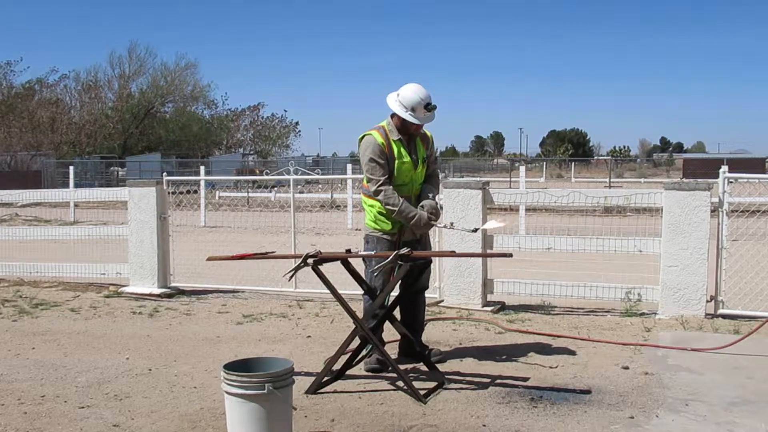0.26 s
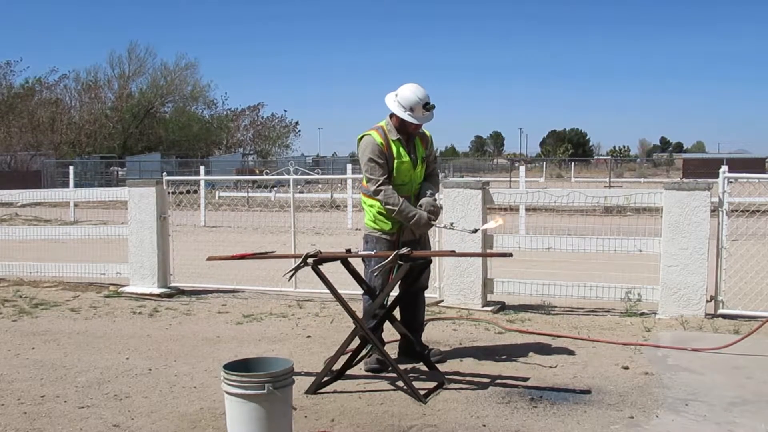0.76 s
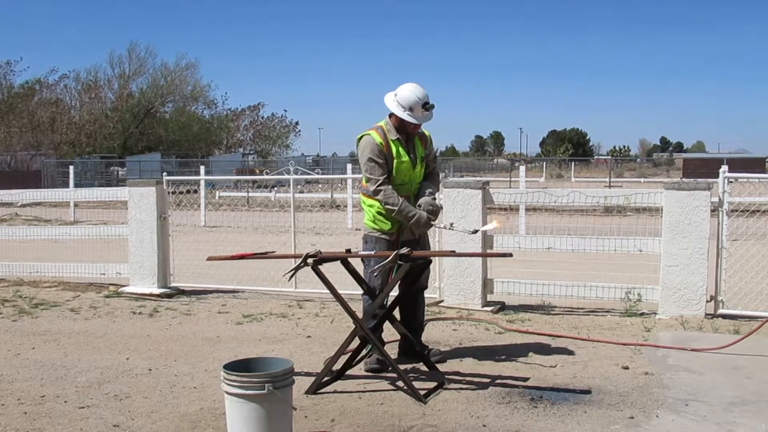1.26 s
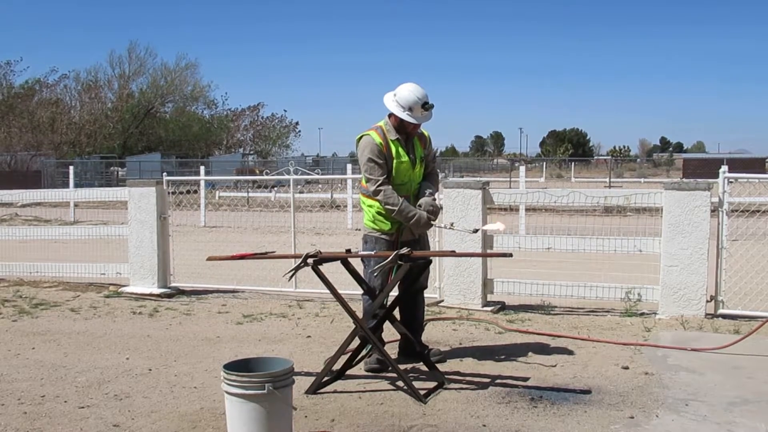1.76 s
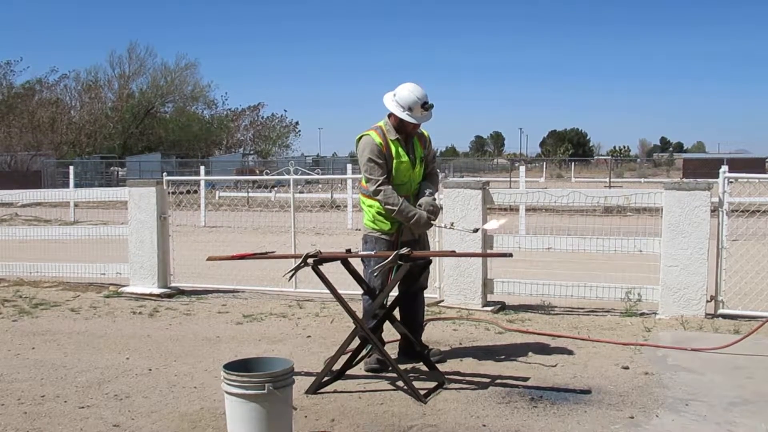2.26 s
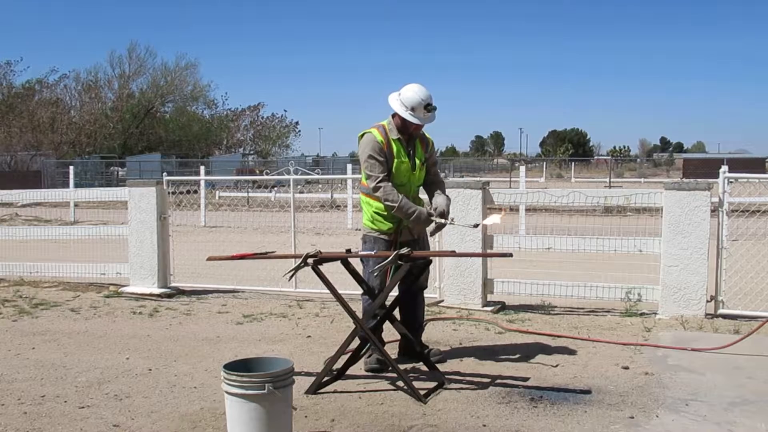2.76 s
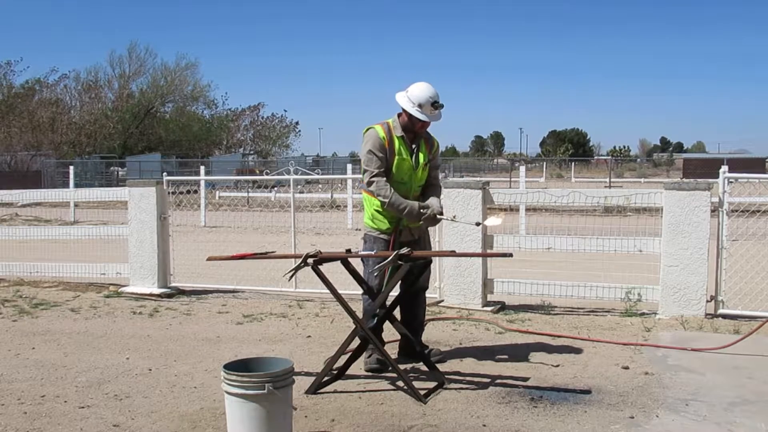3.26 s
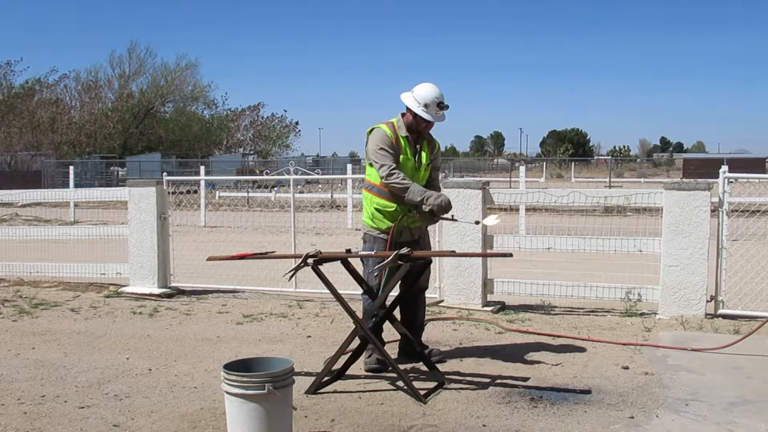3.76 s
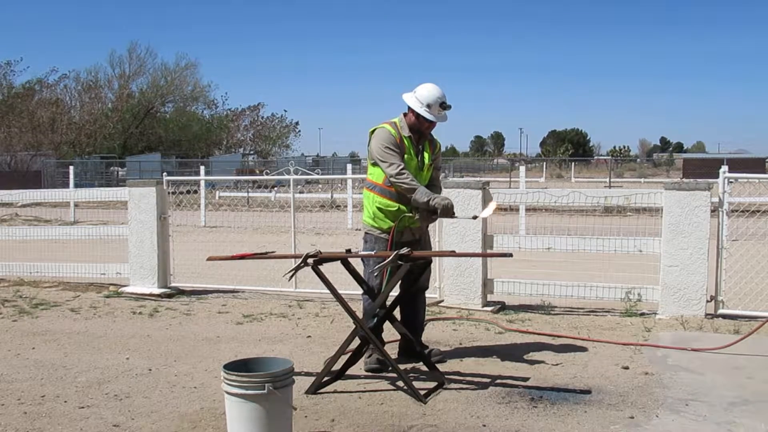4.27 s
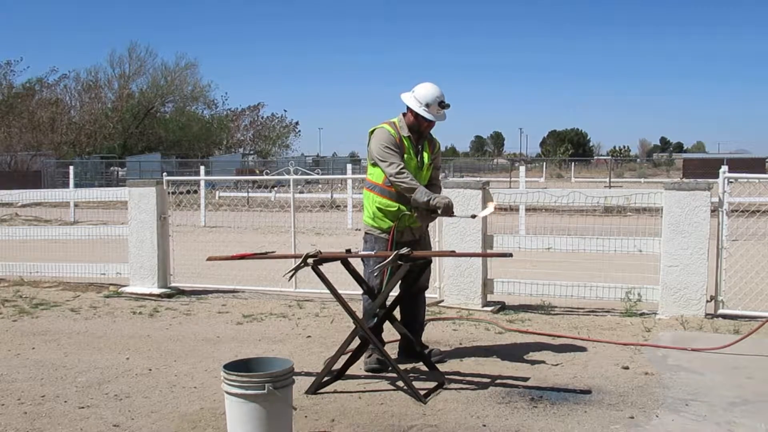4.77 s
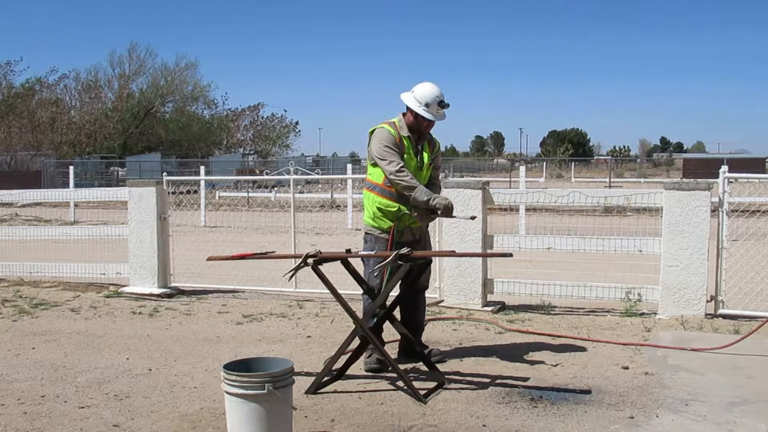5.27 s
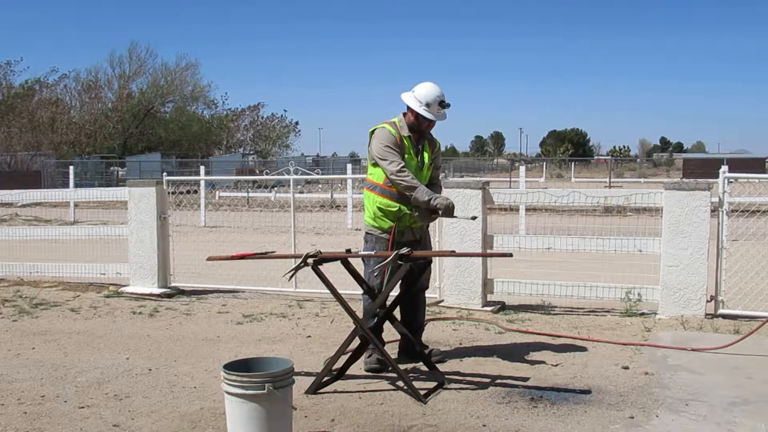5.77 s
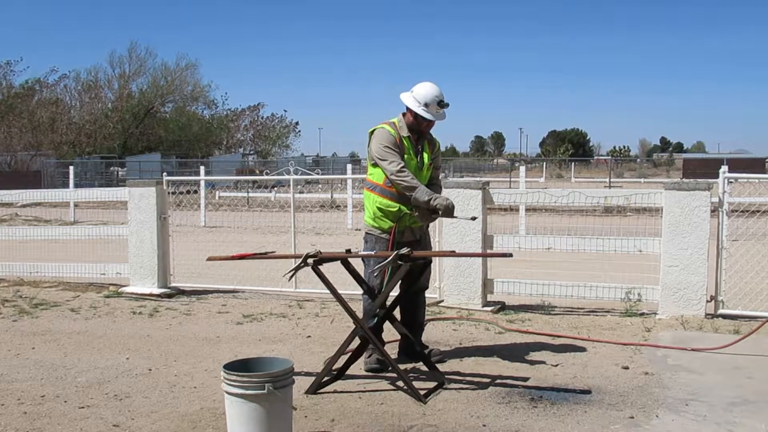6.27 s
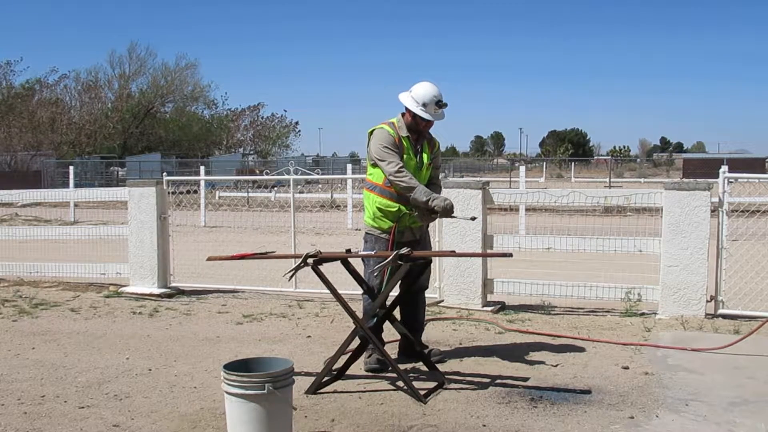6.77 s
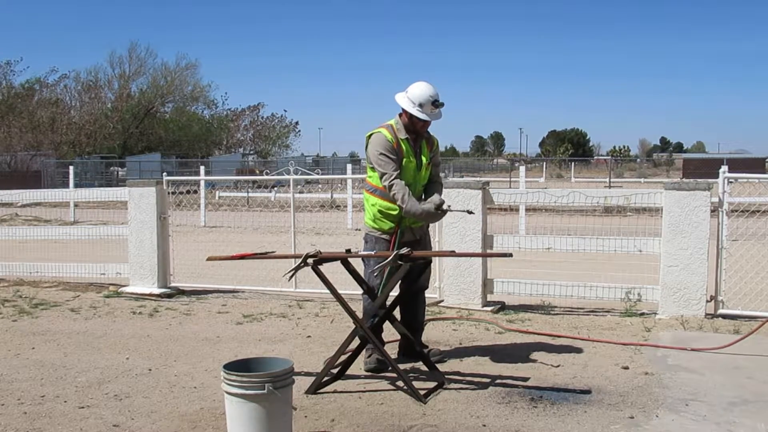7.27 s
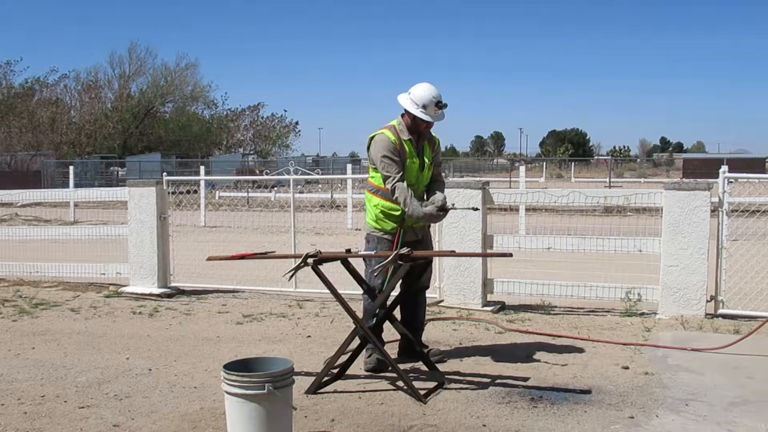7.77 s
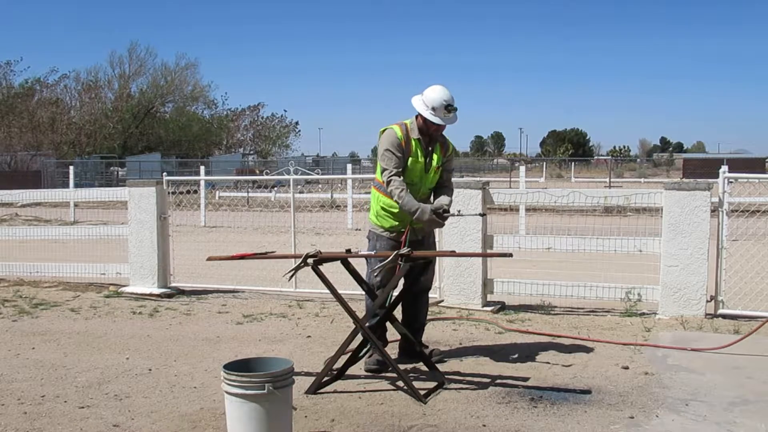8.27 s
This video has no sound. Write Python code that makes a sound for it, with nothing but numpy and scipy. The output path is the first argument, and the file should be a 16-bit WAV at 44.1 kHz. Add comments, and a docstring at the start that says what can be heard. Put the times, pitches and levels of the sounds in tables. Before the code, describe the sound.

A gas torch flame roars and flutters outdoors, snaps tight with a bright crack, then hisses steadily while wind thumps the microphone.

```python
"""Cutting torch in a windy yard

A gas flame roars, fizzes and flutters, heard straight and off the hard ground: coloured noise with drawn levels.
It spits decaying bursts of noise, snaps tight with one bright ringing crack, and later the oxygen jet hisses briefly.
Gusts and single eddies thump on the microphone port: lumpy low noise and short sliding pulses.
The flame level is drawn to sink around the gusts. Faint wavering tones and hiss from the electronics lie beneath.
"""
import sys
import numpy as np
from scipy import signal
from scipy.fft import rfft, irfft, next_fast_len
from scipy.io import wavfile
from scipy.ndimage import uniform_filter1d, minimum_filter1d, map_coordinates

SR = 44100
rng = np.random.default_rng(int(sys.argv[2]) if len(sys.argv) > 2 else 0)


def wav_record(signal):
    """Record a signal, one row per channel, as 16-bit PCM in the file named by sys.argv[1]."""
    frames = np.transpose(np.atleast_2d(signal))
    bounded = np.clip(frames, -1, 1)
    # unit amplitude maps onto the largest positive 16-bit level
    quanta = np.round(bounded * 32767).astype(np.int16)
    wavfile.write(sys.argv[1], SR, quanta)


N = 375732

# Every spectrum gives a relative shape (density per Hz); rush() scales the noise to rms 1.
# Flame level before flicker: start_s, base_db, fizz_db (over the base), body_db (gain on the low body)
FLAME_LEVELS = [(0, -31, -6, 0), (.5, -33.5, -6.5, 2), (.58, -37, -9.5, 2), (1.06, -38.5, -6, -1),
                (1.1, -45, -7, -2), (1.15, -51, -8, 4), (1.17, -54.5, -9, 0), (1.25, -60, -11, 2),
                (1.27, -50, -2, -3), (1.29, -51, -4, -3), (1.305, -55, -11, 2), (1.375, -61, -10, 0),
                (1.39, -53, -4, -6), (1.42, -58, -7, -4), (1.5, -53, -2, -4), (1.54, -45.5, -4, -6),
                (1.62, -46, -7.5, -6), (1.87, -45, -0.5, 3), (1.9, -51, -6, -5), (2.32, -47, -4, -3),
                (2.41, -41, -7, -4), (2.58, -41, -6, -2), (2.78, -44, -4.5, -7), (2.85, -42.5, -3.5, 1),
                (2.935, -42.5, -6, 0), (2.95, -47.5, -3, 0), (3.01, -48.5, -6, 5), (3.05, -46, -5, 0),
                (3.066, -37, -7, -3.5), (3.3, -39.5, -5, 0), (3.84, -40.5, -5.5, 0.5), (4.1, -39, -6, -1.5),
                (4.34, -40.5, -8, 6), (5.0, -38, -6.5, 2.5), (5.2, -40, -9, 8), (5.315, -36, -9, 5),
                (5.33, -46, -20, 20), (5.4, -46, -30, 9), (5.6, -50, -32, 2), (5.89, -45, -13.5, 1.2),
                (6.22, -39, -14, 1.5), (7.5, -34, -12, 1), (7.86, -28.5, -8, -5.5), (8.16, -31, -11.5, 4),
                (8.52, -28.5, -12, -0.5)]
# Spectrum of the burning roar: pitch_hz, density_db
ROAR_SPECTRUM = [(330, -32), (460, -3.5), (800, -3.5), (960, -2.5), (1060, -7), (1600, -5.5), (3000, -10),
                 (4500, -18), (7000, -26.5), (12000, -58)]
# Spectrum of the fine eddies at the tip: pitch_hz, density_db
FIZZ_SPECTRUM = [(1500, 2.5), (3500, 0), (5000, -1), (7000, -4), (10000, -7), (11300, -9), (12000, -17),
                 (15000, -63)]
# Narrow resonances of the tip that colour the roar: pitch_hz, width_hz, boost_db (of the added band)
TIP_RESONANCES = [(462, 28, -2), (867, 57, -10), (1158, 27, 4.5), (1483, 20, 2.5), (1626, 8.3, -10),
                  (2245, 24, -8), (2383, 23, -3), (3390, 21, -4.5), (4840, 23, -15)]
# The flame flares up or falters: centre_s, change_db, half_length_s (to 1/e of the change)
FLARES = [(0.187, 4.5, 0.053), (0.953, 1, 0.025), (1.651, 3, 0.015), (1.736, 5.5, .025),
          (3.13, -3.5, 0.018), (3.185, 4.5, .02), (3.24, 3.5, .012), (3.29, 3.5, 0.014), (3.637, 4.5, .03),
          (3.874, 3, 0.025), (3.931, 9, 0.032), (4.005, 2, .03), (4.1, 4, 0.026), (4.172, -5.5, 0.015),
          (4.268, 7.5, 0.038), (4.313, 4, 0.0098), (4.527, 2.5, .025), (4.597, 3.5, .009),
          (4.654, 3, 0.018), (4.704, 4.5, 0.011), (4.84, -4, 0.036), (4.96, 2, 0.026), (5.07, 7.5, 0.033),
          (5.118, 6, .012), (6.1, 4.5, 0.015), (6.152, 3.5, 0.025), (7.04, 2.5, 0.017)]
# Spectrum of the oxygen jet: pitch_hz, density_db
JET_SPECTRUM = [(1060, -36), (1800, -5), (2360, -2), (2600, -3), (3030, -3.5), (10900, -8.5), (15400, -24)]
# The flame spits and snaps: start_s, level_db (where the decay starts)
SNAP_TIMES = [(3.0614, -43), (3.1562, -31), (3.909, -38), (4.3734, -43), (5.022, -27.5), (5.062, -26.5),
              (5.0765, -29), (5.1078, -41), (5.237, -29), (5.2894, -35)]
# Spectrum of a snap: pitch_hz, density_db
SNAP_SPECTRUM = [(590, -34), (1000, 3), (2900, 3.5), (3360, -3), (6100, -10.5), (13100, -23), (15400, -32)]
# Spectrum of the bright crack: pitch_hz, density_db
POP_SPECTRUM = [(700, -30), (1500, -3), (2900, -11), (4200, -14), (5400, -9), (6800, -17), (9000, -21),
                (13900, -18), (15400, -26)]
# Ringing tones of the metal tip at the crack: pitch_hz, level_db (where the decay starts), t60_s
NOZZLE_RING = [(1515, -27, 0.085), (5250, -33, 0.066), (5870, -30, 0.091)]
# Delay of the path off the ground behind the straight one: start_s, lag_ms
GROUND_LAG = [(0, 1.22), (1.3, 1.22), (1.95, 1.18), (2.3, 1.25), (2.65, 1.272), (3.8, 1.267), (4.4, 1.335),
              (4.8, 1.345), (5.45, 1.33), (5.8, 1.29), (7.2, 1.25), (7.6, 1.305), (8.52, 1.315)]
# Gusts at the port: start_s, length_s, buffeting_db, rasp_db (gain on the part above the rumble)
GUSTS = [(0, 0.065, -33, -11), (0.342, .02, -34, -7), (0.51, .03, -26, -6), (0.542, 0.052, -27, -14),
         (.79, .1, -38, -18), (1.17, 0.1, -23.5, -8), (1.3, .05, -36, -16), (1.35, 0.13, -28, -12),
         (1.482, .055, -23, -1.5), (1.532, .13, -24.5, -10), (1.69, 0.055, -22, -2),
         (1.765, 0.113, -26, -7), (1.996, 0.04, -29.5, -4), (2.043, 0.079, -18.5, -7),
         (2.165, .018, -26, -6), (2.2, .033, -24, 0), (2.242, 0.17, -27.5, -7.5), (2.45, .02, -37, -13),
         (2.7, .04, -24, -18), (2.8, 0.071, -24, -8), (2.864, 0.062, -20, 0), (2.94, .04, -28.5, -10),
         (4.045, 0.068, -38, -12), (5.067, 0.072, -28.5, -22), (5.19, 0.028, -29, -9),
         (5.278, .025, -24, -12), (5.308, 0.06, -20, 2), (5.375, 0.073, -29, 3), (5.468, .058, -22, 6),
         (5.542, .014, -26, -1), (5.575, .01, -26, -1), (5.597, .025, -22, 3), (5.632, .012, -28, 0),
         (5.655, .06, -31, -12), (5.975, .045, -34, -11), (7.307, 0.054, -30, -6), (7.372, 0.12, -25, -7)]
# Spectrum of gusts and of the flurry behind an eddy: pitch_hz, density_db
BUFFET_SPECTRUM = [(15, -38), (28, -5), (60, 6.5), (195, 4), (391, -2.5), (465, -3.5), (744, -14.5),
                   (1600, -46), (2080, -54), (3520, -120)]
# Calm air at the port, before its slow wobble: start_s, level_db
CALM_LEVELS = [(0, -40), (.31, -42.5), (.7, -44), (.88, -41), (1.1, -46), (2.6, -46.5), (3.28, -46),
               (3.8, -42.5), (4.0, -43.5), (4.1, -41), (5.0, -36.5), (5.7, -44), (6.1, -49.5), (6.79, -48),
               (7.26, -44), (7.95, -41), (8.52, -41)]
# Spectrum of calm air: pitch_hz, density_db
BREEZE_SPECTRUM = [(15, -50), (30, -15.5), (85, -5), (145, -1.5), (275, -9.5), (305, -9.5), (420, -6),
                   (550, -45), (920, -120)]
# Single eddies that thump on the port, from faint to hard:
# blow_s, strength_db, pitch_hz (at the blow), edge_db (over the strength)
EDDIES = [(.015, -19.5, 132, -40), (0.056, -18.5, 129, -40), (.504, 2, 260, -28), (.511, -4, 600, -12),
          (.516, 7, 405, -20), (.519, -2, 252, -25), (.526, -6, 130, -30), (0.543, -17, 140, -31),
          (.573, -7, 218, -30), (1.161, 0, 203, -21), (1.188, -12, 150, -34), (1.212, -13.5, 220, -30),
          (1.247, -12, 120, -30), (1.253, -17, 420, -20), (1.26, -8.5, 170, -23), (1.282, 2.5, 139, -35),
          (1.286, 0, 382, -19), (1.296, -13, 400, -26), (1.357, -11, 150, -38), (1.393, -12.5, 190, -35),
          (1.401, -6.5, 250, -40), (1.421, -16, 452, -24), (1.433, -10, 262, -29), (1.48, -17, 300, -19),
          (1.487, -13, 420, -17), (1.495, -11, 400, -20), (1.503, -1, 300, -25), (1.508, -6, 450, -20),
          (1.524, -14, 350, -22), (1.549, -14, 150, -30), (1.515, -3.5, 308, -30), (1.587, -8.5, 180, -33),
          (1.611, -7, 159, -34), (1.62, -9, 179, -30), (1.64, -10, 330, -28), (1.665, -5.5, 213, -38),
          (1.69, -3.5, 340, -38), (1.714, -11, 230, -12), (1.742, -17, 149, -22), (1.762, -16, 120, -30),
          (1.77, -1.5, 300, -20), (1.774, -9, 280, -27), (1.787, -2, 330, -26), (1.792, -4, 280, -27),
          (1.797, 1, 445, -12), (1.804, -10, 330, -25), (1.819, -6, 330, -22), (1.831, -6, 380, -15),
          (1.84, 0, 380, -21), (1.85, 2.5, 514, -16), (1.859, -11, 380, -20), (1.864, -7, 450, -18),
          (1.87, -4, 600, -19), (1.874, 4, 408, -13.5), (1.901, -15, 240, -29), (1.911, -19, 260, -29),
          (1.937, -27, 150, -35), (1.988, -3, 269, -35), (2.004, -22, 350, -25), (2.04, -18, 200, -28),
          (2.067, -11.5, 160, -27), (2.085, -14, 170, -30), (2.095, -8.5, 260, -21), (2.111, -5, 270, -32),
          (2.12, -7.5, 238, -38), (2.166, -10, 260, -34), (2.176, -10, 222, -33), (2.126, -18, 200, -30),
          (2.211, -13, 380, -21), (2.226, -14, 380, -18), (2.27, -20, 220, -28), (2.317, -21, 150, -30),
          (2.393, -15, 200, -28), (2.458, -23, 170, -30), (2.305, -13, 160, -29), (2.381, -12, 230, -26),
          (2.698, -4.5, 201, -41), (2.708, -3.5, 180, -43), (2.716, -15, 200, -35), (2.725, -12, 120, -35),
          (2.769, -23, 300, -25), (2.804, -9.5, 120, -38), (2.813, -10, 280, -30), (2.831, -18, 250, -28),
          (2.841, -9, 230, -23), (2.878, -3.5, 200, -30), (2.886, -15, 230, -30), (2.896, -17, 350, -22),
          (2.901, -8, 480, -15), (2.907, -5, 382, -16), (2.927, -10, 315, -19), (2.954, -8.5, 188, -31),
          (2.963, -15.5, 220, -30), (4.058, -25, 110, -40), (4.092, -22, 120, -35), (5.083, -19, 200, -13),
          (5.188, -12, 150, -28), (5.195, -10, 149, -28), (5.214, -8, 160, -30), (5.22, -3, 314, -31),
          (5.275, -4.5, 160, -26), (5.286, -4, 107, -24), (5.308, 6, 292, -15), (5.322, 3, 367, -13),
          (5.337, 3.5, 315, -13), (5.352, -4, 260, -28), (5.363, 1.5, 720, -7.5), (5.38, -10, 360, -8),
          (5.394, -4.5, 505, -10), (5.372, -6, 400, -10), (5.421, -11, 350, -7.5), (5.427, -14.5, 500, -11),
          (5.475, -7, 270, -13), (5.484, -4.5, 490, -7.5), (5.49, -5, 500, -13), (5.499, -2, 342, -18),
          (5.505, -3, 300, -13), (5.512, -4, 330, -18), (5.52, -2.2, 330, -11), (5.546, -6.5, 302, -18),
          (5.577, 6, 500, -16), (5.584, -10, 450, -10), (5.552, -13, 450, -12), (5.598, -12, 450, -9),
          (5.606, -9, 500, -4), (5.612, 0.5, 320, -10.5), (5.619, -7.5, 420, -5.5), (5.641, -5.5, 383, -14),
          (5.704, -23.5, 170, -30), (5.859, -32, 170, -30), (5.802, -28.5, 190, -30),
          (5.875, -29, 150, -30), (5.95, -23, 180, -30), (5.975, -27, 200, -27), (5.99, -21, 200, -22),
          (6.0, -13.5, 170, -25), (6.006, -17, 280, -22), (7.306, -8.5, 191, -25), (7.322, -13, 140, -22),
          (7.335, -7.5, 198, -31), (7.356, -16, 250, -16), (7.394, -14, 190, -23), (7.408, -6.5, 308, -24),
          (7.422, -9, 161, -25), (7.47, -13.5, 191, -21)]
# Spectrum of the sharp edge of a blow: pitch_hz, density_db
EDGE_SPECTRUM = [(350, -24), (650, 8.5), (1100, -5), (1800, -21), (2700, -28), (4000, -56), (7000, -90)]
# Level of the electronic noise, drawn to sink after the hardest gusts: start_s, change_db
ELECTRONICS_LEVELS = [(0, 0), (1.1, 8), (1.9, 1.5), (2, -1.5), (3, 1.5), (5.2, 11.5), (5.34, -5),
                      (5.65, -11), (5.9, -6), (6.5, 0.5), (8.52, 3)]
# Electronic tones before their waver and level change: pitch_hz, peak_db
WHINE_TONES = [(7337, -75), (7503, -69), (8354, -77), (10718, -70), (10896, -76)]
# Spectrum of the electronic hiss: pitch_hz, density_db
HISS_SPECTRUM = [(1500, -27), (3000, -32), (5500, -28), (7150, -10), (7450, -3), (7800, -8), (9500, -12),
                 (10800, 4.5), (11400, -6), (13000, -9), (15000, -22)]

FLUTTER_DB, FLARE_FLUTTER = 0.91, 0.2  # depth scale of the flicker; extra depth per dB of flare or falter
TIGHT_FLUTTER = 0.58  # share of the slow flicker that the tight flame keeps
JET_OPEN_S, JET_SHUT_S, JET_DB = 7.615, 7.895, -30
JET_RISE_DB_PER_S, JET_FALL_DB_PER_S = 700, 300
JET_SWELL_S, JET_SWELL_DB, JET_SWELL_HALF_S = 7.79, 4.5, 0.13  # the jet swells over its base level
SNAP_T60_S = 0.091
POP_S, POP_DB, POP_T60_S = 5.2475, -20.5, 0.059
GUST_RISE_DB_PER_S, GUST_FALL_DB_PER_S = 1200, 700
# the lowest sound is cut sharply for a moment and comes back
BASS_OUT_S, BASS_BACK_S, BASS_DROP_DB, BASS_FADE_DB_PER_S = 7.63, 7.925, 47, 2500
EDDY_CYCLES = 0.3  # time scale in the eddy's own cycles: it builds in 2/3 of this and lets go in twice this
# tick in a blow: pitch over the eddy's, half length in the eddy's cycles, dB over the edge
TICK_PITCH, TICK_CYCLES, TICK_DB = 2.33, 0.23, -3.5
LIMIT_S, TOP_HZ = 0.0015, 15500  # limiter reach; band limit


def flame():
    """Turbulent burning roars and finer eddies at the tip fizz; both flutter together, more so in a flare."""
    base_db, fizz_db, body_db = curves(FLAME_LEVELS)
    t = np.arange(N) / SR
    coarse_t = t[::32]
    flares = sum(db * np.exp(-((coarse_t - s) / half) ** 2) for s, db, half in FLARES)
    flare_db = np.interp(t, coarse_t, flares)

    slow_share = np.where(t < POP_S, 1, TIGHT_FLUTTER)
    flicker = 0.85 * slow_share * wobble(16) + 0.5 * wobble(45) + wobble(140)
    flutter_db = (FLUTTER_DB + FLARE_FLUTTER * np.abs(flare_db)) * flicker

    roar = amp(2.0) * resonant(rush(ROAR_SPECTRUM, patchy_db=1.23))
    # the drawn body gain raises or lowers the flame's low part
    body = filtered(roar, lambda hz: 1 / (1 + (hz / 1000) ** 6))
    fizz = amp(fizz_db) * rush(FIZZ_SPECTRUM, patchy_db=2.0)
    return amp(base_db + flare_db + flutter_db) * (roar + (amp(body_db) - 1) * body + fizz)


def resonant(x):
    """The torch tip adds a few narrow resonant bands to the sound."""
    def response(f):
        return 1 + sum(amp(db) * 1j * f * w / (c * c - f * f + 1j * f * w) for c, w, db in TIP_RESONANCES)
    return filtered(x, response)


def jet():
    """The lever lets a bright, smooth stream of oxygen through the tip, strongest in mid-stroke."""
    t = np.arange(N) / SR
    lever_db = plateau(JET_OPEN_S, JET_SHUT_S - JET_OPEN_S, JET_RISE_DB_PER_S, JET_FALL_DB_PER_S)
    swell_db = JET_SWELL_DB * np.exp(-((t - JET_SWELL_S) / JET_SWELL_HALF_S) ** 2)
    return amp(JET_DB + lever_db + swell_db) * rush(JET_SPECTRUM, patchy_db=1.5)


def snaps():
    """Pockets of gas go off at once: a quick rise and a dying crackle."""
    level = np.zeros(N + SR)
    t = np.arange(SR // 4) / SR
    for s, db in SNAP_TIMES:
        burst = amp(db - 60 * t / SNAP_T60_S) * (1 - np.exp(-t / 0.0005))
        level[round(s * SR):][:len(t)] += burst
    return level[:N] * rush(SNAP_SPECTRUM)


def pop():
    """The flame snaps tight with one crisp bright crack and a short ring of the metal tip."""
    t = np.clip(np.arange(N) / SR - POP_S, 0, None)
    rise = 1 - np.exp(-t / 0.0005)
    crack = amp(POP_DB - 60 * t / POP_T60_S) * rush(POP_SPECTRUM)
    ring = sum(amp(db - 60 * t / t60) * np.sin(2 * np.pi * hz * t) for hz, db, t60 in NOZZLE_RING)
    return rise * (crack + ring)


def off_ground(x):
    """Hard ground adds a later, duller copy; the comb shifts as the torch is raised or lowered."""
    dull = filtered(x, lambda hz: 0.43 / (1 + (hz / 11000) ** 2))
    lag_samples = curves(GROUND_LAG)[0] * SR / 1000
    return x + map_coordinates(dull, [np.arange(N) - lag_samples])


def wind():
    """Calm air is a soft even rumble; gusts break into round lumps with a rasp on top."""
    each_db = np.array([db + plateau(s, long, GUST_RISE_DB_PER_S, GUST_FALL_DB_PER_S)
                        for s, long, db, _ in GUSTS])
    # the strongest gust rules
    gust_db = each_db.max(axis=0)
    rasp_db = np.transpose(GUSTS)[-1][each_db.argmax(axis=0)]
    rasp_db = uniform_filter1d(rasp_db, size=441)

    away_db = np.clip(plateau(BASS_OUT_S, 0, 0, BASS_FADE_DB_PER_S), -BASS_DROP_DB, 0)
    back_db = np.clip(plateau(BASS_BACK_S, 0, BASS_FADE_DB_PER_S, 0), -BASS_DROP_DB, 0)
    bass_cut = amp(np.maximum(away_db, back_db))

    whole = rush(BUFFET_SPECTRUM, patchy_db=2.5)
    rumble = filtered(whole, lambda hz: 1 / (1 + (hz / 330) ** 4))
    rasp = amp(rasp_db) * (whole - rumble)
    lumps = unit(amp(3.4 * wobble(35) + 3.6 * wobble(110)))
    gusts = (rumble + rasp) * lumps
    calm = amp(curves(CALM_LEVELS)[0] + 1.1 * wobble(19)) * rush(BREEZE_SPECTRUM)
    return bass_cut * (amp(gust_db) * gusts + calm)


def eddies():
    """Each eddy strikes the membrane sharply and lets go more slowly, trailing a flurry of smaller ones."""
    out = np.zeros(N + SR)
    t = np.arange(-2000, 2000) / SR
    chance = rng.random((len(EDDIES), 2))
    flurry, crackle = np.pad([rush(BUFFET_SPECTRUM), rush(EDGE_SPECTRUM)], ((0, 0), (2000, SR)))
    corner = np.sqrt(t ** 2 + 0.00023 ** 2)  # a rounded point at the moment of the blow
    for (s, db, hz, edge_db), (turn, bend) in zip(EDDIES, chance):
        i = round(s * SR)
        # push or pull by chance, with some scatter in phase
        start_turns = np.round(turn) / 2 + 0.33 * (2 * turn % 1 - 0.5)
        slide = 1 + 25 * (bend - 0.7) * np.clip(t, -0.01, 0.01)  # pitch slides as it passes
        phase = 2 * np.pi * (start_turns + hz * t * slide)
        push = np.exp(-(corner - 0.5 * t) * hz / EDDY_CYCLES) * np.cos(phase)
        tail = 0.12 * np.exp(-(corner - 0.31 * t) / 0.0055) * flurry[i:i + len(t)]
        edge = amp(edge_db) * np.exp(-corner / 0.0017) * crackle[i:i + len(t)]
        tick_shape = np.exp(-(t * hz / TICK_CYCLES) ** 2)
        tick = amp(edge_db + TICK_DB) * tick_shape * np.cos(TICK_PITCH * phase)
        out[i:i + len(t)] += amp(db) * (0.9 * push + tail + edge + tick)
    return out[2000:N + 2000]


def electronics():
    """Faint circuit noise: a few thin tones, wavering in level and phase, over hiss."""
    t = np.arange(N) / SR
    tones = np.zeros(N)
    for hz, db in WHINE_TONES:
        waver = amp(3.5 * wobble(18)) * np.exp(0.9j * wobble(25))
        tones += amp(db) * np.imag(waver * np.exp(2j * np.pi * hz * t))
    hiss = amp(-64.0) * rush(HISS_SPECTRUM)
    return amp(curves(ELECTRONICS_LEVELS)[0]) * (tones + hiss)


def rush(spectrum, patchy_db=0):
    """Turbulence as coloured noise of rms 1, with smooth random gain patches in time and pitch."""
    f, db = np.transpose(spectrum)
    z = signal.stft(rng.standard_normal(N), nperseg=512)[2]
    field = uniform_filter1d(rng.standard_normal(z.shape), size=8, axis=0)
    field = uniform_filter1d(field, size=8, axis=1)
    patchy = signal.istft(z * amp(patchy_db * unit(field)), nperseg=512)[1][:N]
    # straight lines between the points on a log pitch scale
    return unit(filtered(patchy, lambda hz: amp(np.interp(np.log(hz + 1), np.log(f + 1), db, left=-90))))


def filtered(x, response):
    """Shape the spectrum of x by a response (real or complex) of frequency."""
    m = next_fast_len(N + SR // 2)
    return irfft(rfft(x, m) * response(np.fft.rfftfreq(m, 1 / SR)), m)[:N]


def wobble(rate):
    """A smooth random curve through normal draws, rate knots a second."""
    knots = rng.standard_normal(int(N * rate / SR) + 4)
    return map_coordinates(knots, [np.arange(N) * rate / SR])


def plateau(start, length, rise, fall):
    """A level held at 0 dB, with straight slopes in dB a second before and after."""
    t = np.arange(N) / SR
    return -rise * np.clip(start - t, 0, None) - fall * np.clip(t - start - length, 0, None)


def curves(rows):
    """One value per sample for each column after the time."""
    s, *cols = np.transpose(rows)
    return [np.interp(np.arange(N) / SR, s, c) for c in cols]


def amp(db):
    """Decibels to a linear amplitude factor."""
    return 10 ** (np.asarray(db) / 20)


def unit(x):
    """Scale a signal to rms 1."""
    return x / np.sqrt(np.mean(x ** 2) + 1e-20)


def scene():
    """The torch is heard straight and off the ground; wind and electronics join at the microphone."""
    torch = flame() + jet() + snaps() + pop()
    return (off_ground(torch) + wind() + eddies() + electronics())[None]


def record(dry):
    """A quick look-ahead limiter turns down peaks over full scale; then the band limit cuts the top."""
    span = round(LIMIT_S * SR)
    needed = 1 / np.maximum(np.abs(dry[0]), 1)
    held = minimum_filter1d(needed, size=2 * span + 1)
    gain = uniform_filter1d(uniform_filter1d(held, size=span), size=span)
    return filtered(dry[0] * gain, lambda hz: hz < TOP_HZ)[None]


dry = scene()
out = record(dry)
wav_record(out)
```